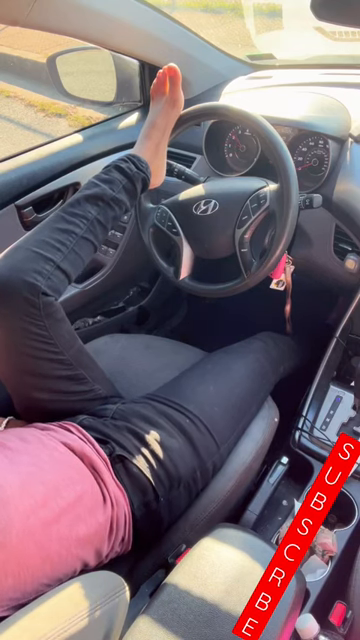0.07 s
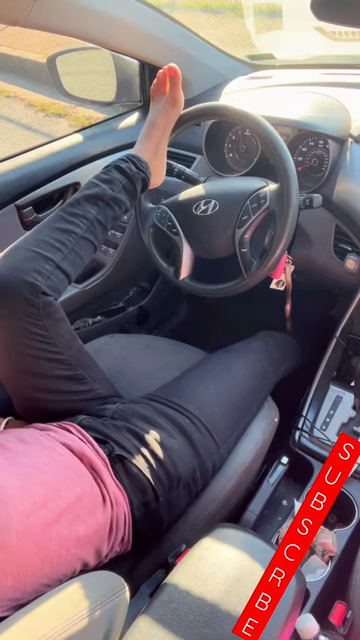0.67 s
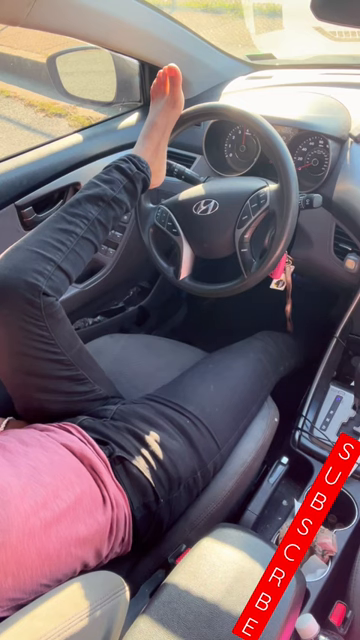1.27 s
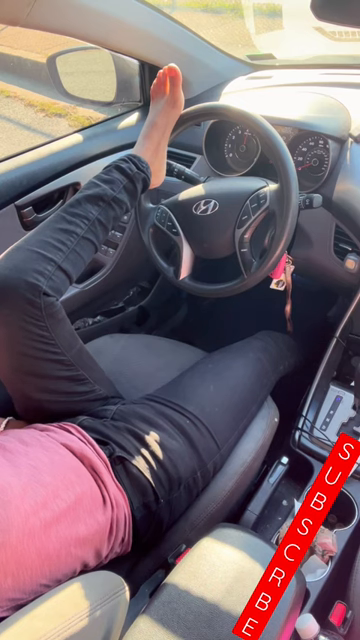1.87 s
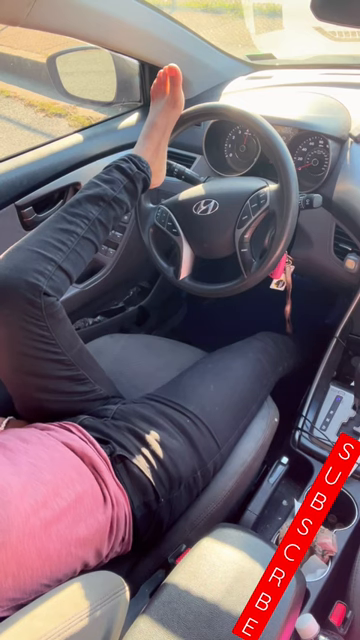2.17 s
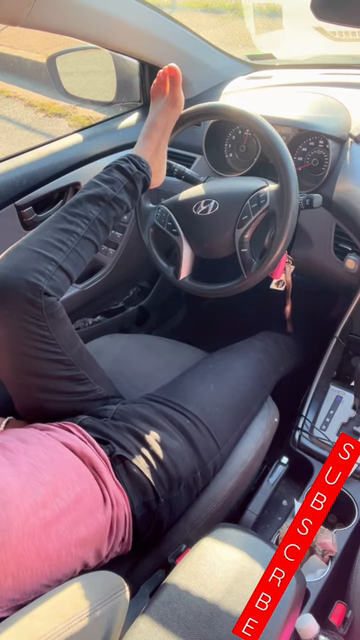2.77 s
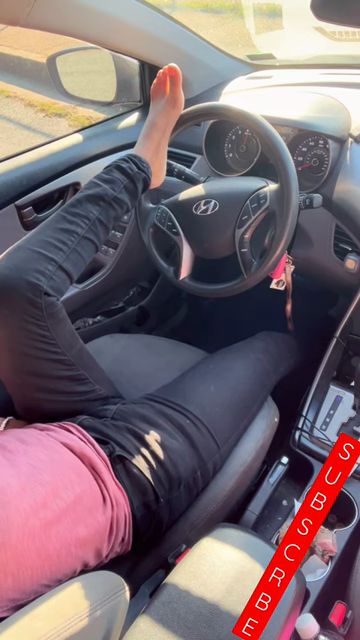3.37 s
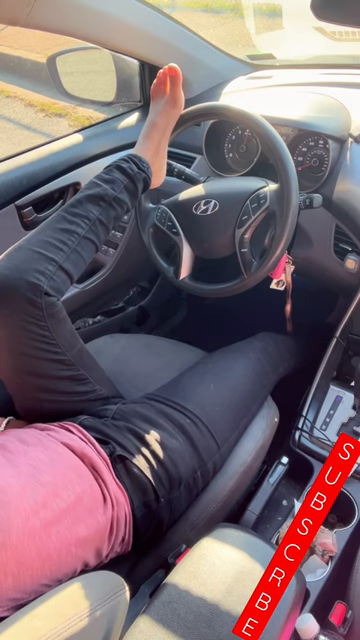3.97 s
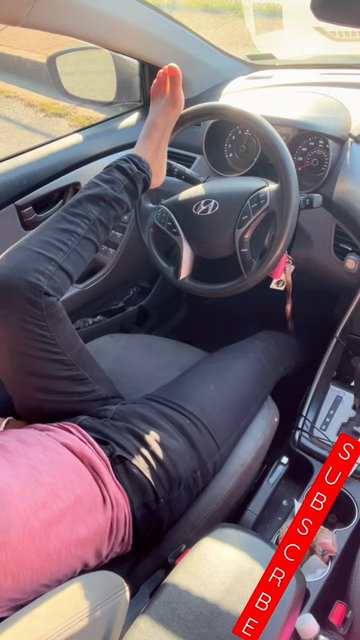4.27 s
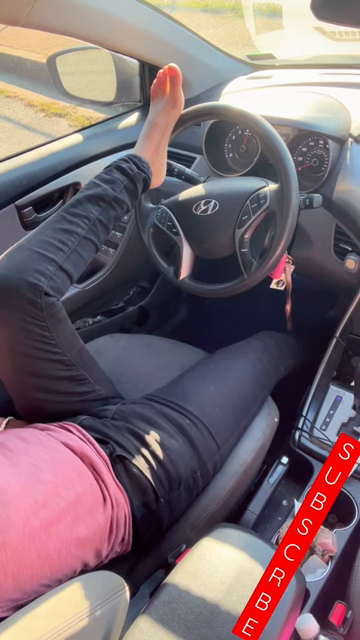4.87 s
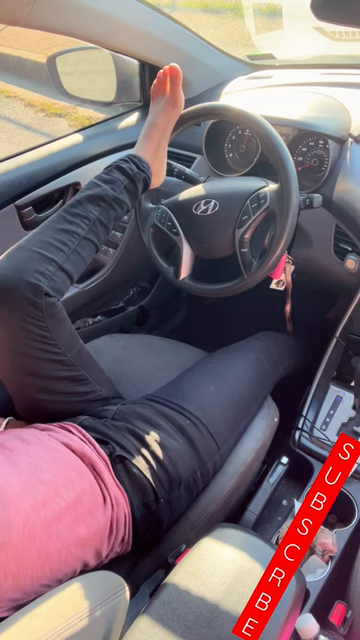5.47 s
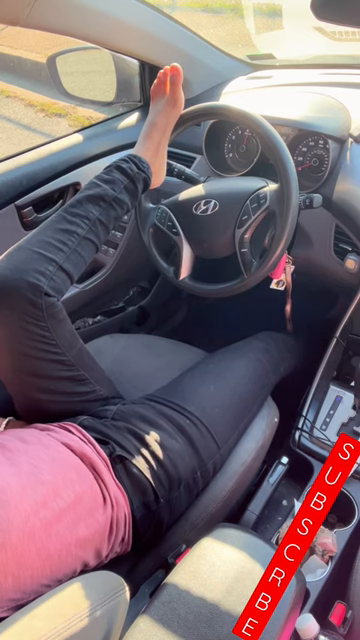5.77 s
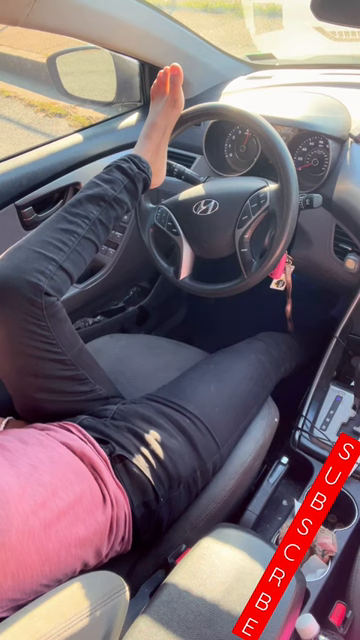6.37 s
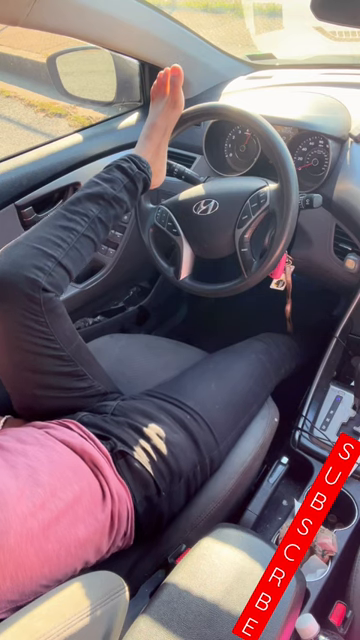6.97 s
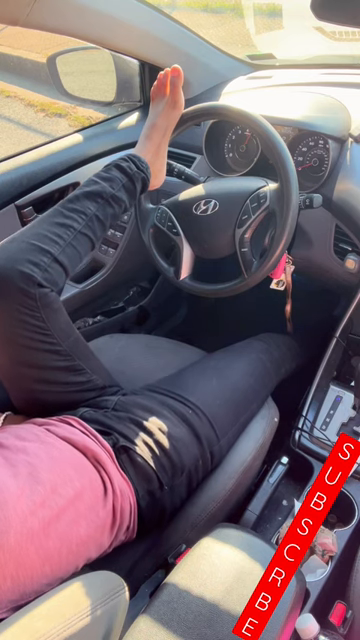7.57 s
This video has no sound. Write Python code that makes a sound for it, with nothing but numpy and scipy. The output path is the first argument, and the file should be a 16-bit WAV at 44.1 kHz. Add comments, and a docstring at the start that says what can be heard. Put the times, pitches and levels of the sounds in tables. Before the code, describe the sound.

Inside a parked car, the engine is revved about eleven times with a booming growl, then held at steady speed with a faint whine.

```python
"""Revving a parked car

A four-cylinder engine from the seat, on a two-port microphone: the pedal is pumped again and again,
then held. The firing note booms in the cabin and cancels briefly as the load changes; weaker crank and
cam orders growl over it and the body shakes. Valve gear clatters behind the bulkhead, the intake hisses
with the throttle, and belt-driven accessories whine at the held speed."""
import sys
import numpy as np
from scipy import signal
from scipy.fft import rfft, irfft
from scipy.io import wavfile
from scipy.ndimage import uniform_filter1d

SR = 44100
rng = np.random.default_rng(int(sys.argv[2]) if len(sys.argv) > 2 else 0)


def transcribe(u):
    """Save the signal u as a 16-bit wav file named by the first command-line argument.

    u: samples, shape (n,) or (channels, n), limited to [-1, 1]; the rate is SR.
    q: integer samples, one column per channel.
    """
    v = np.clip(np.atleast_2d(u).T, -1, 1)
    q = np.round(v * 32767).astype(np.int16)
    wavfile.write(sys.argv[1], SR, q)


N = 340011
TIME = np.arange(N) / SR
BINS = np.fft.rfftfreq(N, 1 / SR)
TICKS = np.arange(0, N / SR, 1 / 400)  # control times, s
FIRINGS = 4  # per four-stroke cycle; an order is a multiple of the cycle rate
MIDDLE_HZ, HIGH_HZ = 158, 163.6  # firing rates at middle and high engine speed

# pumps of the pedal: press t/s, firing f/Hz, crest t/s, firing f/Hz; then the boom in each pump:
# coasting swell t/s, lift/dB, sag t/s, depth/dB, lift under load/dB, unloading t/s, coasting t/s
PUMPS = [(-0.12, 119.0, 0.119, 131.7, 0.13, 7.5, 0.209, 8, 0.5, 0.051, 0.13),
         (0.494, 110.3, 0.858, 157.7, 0.651, 5.5, 0.734, 14.5, 7.5, 0.873, 1.04),
         (1.27, 130.4, 1.635, 161.8, 1.174, 10.5, 1.28, 5, 7.5, 1.556, 1.72),
         (1.947, 140.6, 2.131, 156.0, 1.934, 10.1, 1.8, 0.0, 6.0, 2.138, 2.24),
         (2.377, 138.8, 2.591, 158.0, 2.33, 18, 2.321, 15.5, 6, 2.581, 2.661),
         (2.873, 140.7, 3.052, 156.5, 2.825, 8.5, 2.887, 1, 8, 3.059, 3.11),
         (3.308, 140.6, 3.531, 159.0, 3.267, 17.5, 3.262, 16, 6.5, 3.5, 3.64),
         (3.801, 143.1, 4.016, 157.6, 3.87, 12.0, 3.596, 5.5, 1.1, 4.017, 4.092),
         (4.275, 141.2, 4.495, 158.5, 4.3, 11, 3.974, 7, 5.5, 4.466, 4.46),
         (4.851, 136.6, 5.119, 160.2, 4.795, 12.5, 4.93, 3, 8, 5.083, 5.251),
         (5.561, 134.3, 5.877, 158, 5.5, 14, 5.56, 12, 9.5, 5.829, 5.8)]
# the pedal held after the last pump: t/s, firing f/Hz
HELD_SPEED = [(5.99, 163.55), (6.1, 166.59), (6.24, 170.19), (6.32, 165.69), (6.41, 160.14), (6.52, 158.94),
              (6.61, 158.65), (6.69, 159.04), (6.8, 160.22), (6.9, 161.09), (7.2, 163.53), (7.4, 164.16),
              (7.71, 164.71)]
# how still the pedal is: t/s, stillness/0-1
PEDAL_STILLNESS = [(0, .15), (5.7, .2), (5.95, 0.5), (6.2, 0.4), (6.45, 0.95), (7.7, 0.95)]
# mechanical effort and air flow grow with speed: firing f/Hz, effort/dB, flow/dB
EFFORT_BY_SPEED = [(111, -49, -78), (130, -45, -75.5), (142, -42.5, -74), (156, -42, -73),
                   (159, -41.4, -72), (164, -40.5, -72), (170, -39, -69)]
# the cabin's answer to the firing note: firing f/Hz, level/dB
BOOM_BY_SPEED = [(112, -24.4), (130, -31), (142, -30.5), (158, -21.5)]
# the firing note with the pedal held: t/s, level/dB
HELD_BOOM = [(5.96, -20), (6.186, -20), (6.32, -26), (6.408, -19), (6.456, -19), (6.494, -26), (6.552, -21),
             (6.58, -23), (7.69, -20)]
# the cabin's answer to the second harmonic: firing f/Hz, level/dB
SECOND_BY_SPEED = [(111, -52), (118, -45), (130, -43), (136, -37), (142, -39), (149, -38), (154, -40.5),
                   (157, -44), (160, -42.5), (162.3, -47), (164.3, -39.5), (170, -35)]
# its answer to the third harmonic: firing f/Hz, level/dB
THIRD_BY_SPEED = [(111, -50.5), (125, -48), (138, -42.5), (147, -45.5), (155, -48), (161, -43),
                  (165, -46.5), (170, -53.5)]
# flares under load: t/s, second harmonic lift/dB, third lift/dB, fourth level/dB, intake roar lift/dB
LOAD_FLARES = [(0.01, 2.5, 7, -49.5, 8), (0.77, 4.5, 3.5, -50, 11), (1.47, 2, 4.5, -48, 7.5),
               (2.06, 3.5, 8.5, -41.5, 7.5), (2.5, 2.5, 5.5, -45.5, 7.5), (2.96, 3, 7.5, -45, 8),
               (3.42, 3, 7, -50, 7), (3.91, 4.5, 7.5, -44.5, 6.5), (4.4, 5.5, 7.5, -50, 7),
               (4.99, 3.5, 8.5, -51.5, 6.5), (5.72, 3.5, 8.5, -53, 7.5)]
# crank and cam lines: order, pumped level/dB, held middle-speed level/dB, high-speed level/dB
GROWL_ORDERS = [(2, -43.5, -45, -49), (3, -50, -52, -42.5), (5, -48.5, -50, -52), (6, -53.5, -56, -56),
                (7, -55, -47.5, -41), (9, -53.5, -45, -50), (10, -52, -56, -55), (11, -55, -51, -60.5),
                (13, -56, -58.5, -58), (14, -53.5, -51, -59), (15, -60, -54, -51.5), (16, -54, -51.5, -47),
                (17, -63, -63, -65), (18, -53.5, -59, -54), (19, -66, -60.5, -57), (20, -59, -61, -65),
                (21, -61, -65, -64), (22, -63, -56, -55), (23, -64.5, -70.5, -76), (24, -64, -59, -58),
                (25, -72.5, -59, -55.5), (26, -64.5, -60.5, -60.5), (27, -72, -63, -68.5),
                (28, -64, -65, -62), (29, -73.5, -72, -69), (30, -66.5, -67, -64.5)]
# cabin resonances: f/Hz, width/Hz, lift/dB
CABIN_MODES = [(70.3, 6, 4), (186, 40, 8.5), (360, 16, 5), (613.5, 24, 8), (1016, 52, 12), (1067, 47, 8)]
# spectrum of the shaking body panels: f/Hz, level/dB
RUMBLE_SPECTRUM = [(12, -25), (25, -7.5), (37, -1.5), (50, -3.5), (72, 1.5), (95, -2.5), (130, 3.5),
                   (185, 1), (240, -10), (400, -26), (1000, -72.5)]
# spectrum of the mechanical noise behind the bulkhead: f/Hz, level/dB
CLATTER_SPECTRUM = [(120, -23), (220, -3), (400, 1), (640, -2.5), (860, -8.5), (950, -9), (1030, -3),
                    (1130, -12), (1200, -13), (1600, -16), (2150, -18), (2500, -22.5), (3100, -28),
                    (4400, -40), (6600, -42.5), (9000, -57.5)]
# outline of the valve gear's lines: f/Hz, level/dB
VALVE_SPECTRUM = [(1000, -66.5), (1300, -67.5), (1600, -68.5), (2200, -69), (2500, -74.5), (3100, -80),
                  (4000, -86.5), (4600, -90.5), (5500, -95.5), (6700, -92.5)]
# bulkhead panel resonances: f/Hz, width/Hz, lift/dB
BULKHEAD_MODES = [(1062, 45, 9), (1330, 40, 3), (1502, 46, 5.5), (1606, 29, 5), (1902, 80, 5),
                  (2130, 38, 11), (2540, 45, 2.5), (6040, 68, 10), (6470, 90, 12.5)]
# spectrum of the cam drive's rasp: f/Hz, level/dB
RASP_SPECTRUM = [(600, -20), (1300, -2.5), (1800, -1.5), (2150, 2), (2600, -9), (3200, -10), (4200, -18),
                 (5200, -24), (8000, -42)]
# strength of that rasp: firing f/Hz, level/dB
RASP_BY_SPEED = [(111, -68.5), (130, -62.5), (142, -59.5), (155, -57), (160, -55.8), (164, -56), (170, -56)]
# throttle hiss as picked up, with a dip near 10 kHz and the microphone's peak at 14 kHz: # f/Hz, level/dB
HISS_AS_PICKED_UP = [(1500, -22), (3000, -1), (4200, 0.5), (5200, 0.5), (6800, 3), (8500, -10.5),
                     (11000, -16), (12500, -7), (14000, 3.5), (15000, -5), (16000, 0)]
# throttle hiss at each press: t/s, half-length/s, lift/dB
HISS_PUFFS = [(0.077, .07, 7), (.83, .09, 7.5), (1.52, .12, 6), (2.12, .055, 7), (2.57, .065, 6.5),
              (3.04, .06, 6), (3.5, .065, 5.5), (3.98, .055, 5.5), (4.47, .06, 5), (5.069, .085, 5.5),
              (5.813, .075, 6)]
# spectrum of the air box, heard in the cabin: f/Hz, level/dB
ROAR_SPECTRUM = [(120, -24), (220, -2), (380, 0), (650, -1), (850, -8), (960, -9.5), (1030, -3.5),
                 (1130, -14.5), (1500, -24), (3000, -52)]
# gear and accessory lines: order, resonant firing f/Hz, width/Hz, level/dB
GEAR_WHINES = [(32, 165, 11, -58), (35, 159, 8, -68), (36, 164, 9, -63), (36, 140, 6, -53.5),
               (40, 159.7, 5.5, -58), (41, 159.5, 6, -65), (44, 161, 7, -64), (44, 168, 7, -58),
               (46, 164.3, 5, -65), (47, 162, 12, -65), (48, 160, 6, -62.5), (52, 163.2, 9, -50),
               (53, 160, 6.5, -60), (54, 161, 8, -68.5), (58, 180, 7, -55.5), (60, 164.2, 5.8, -53.5),
               (62, 160, 8, -68), (76, 163.8, 5, -72), (152, 170, 5, -73.5)]
# alternator lines: shaft harmonic, level/dB
ALTERNATOR_LINES = [(1, -45), (2, -42), (4, -63), (5, -60), (6, -67), (9, -73), (10, -69), (11, -74),
                    (12, -76), (15, -85), (17, -81), (18, -81.5), (19, -86), (21, -83), (23, -90),
                    (24, -90)]
# the alternator housing's resonance: f/Hz, width/Hz, lift/dB
HOUSING_MODE = [(3612, 70, 12)]
# colour of the cabin reflections: f/Hz, level/dB
REFLECTION_SPECTRUM = [(100, -14), (290, -2), (500, 4), (2000, 2), (7000, 0)]
# how alike noise is at the two microphone ports: f/Hz, correlation/0-1
PORT_LIKENESS = [(60, .995), (130, .985), (290, .88), (660, .5), (1050, .8), (1400, .5), (2200, .7),
                 (3500, .15), (4500, .35), (6000, .72), (7500, .6), (13000, .98)]
# left port over right: f/Hz, level/dB
PORT_BALANCE = [(30, .2), (120, .6), (148, 1.2), (159, 1.5), (164, 2.2), (170, 3), (200, 2), (350, 2.3),
                (700, 2.1), (1400, 1.4), (2500, 2), (5000, .4), (14000, .3)]
# lead of the left port: f/Hz, phase/rad
PORT_LEAD = [(20, 0), (150, -.15), (400, -.42), (650, -.5), (800, -.95), (1100, -.8), (2100, -1.8),
             (3200, -3.6), (3800, -5.4), (4300, -5.8), (4800, -5), (6200, -5.1), (8500, -3.6),
             (12500, -6.2)]


def from_db(db):
    """Decibels to gain."""
    return 10 ** (np.asarray(db) / 20)


def unit(x):
    """Scales to rms 1."""
    return x / np.sqrt(np.mean(x ** 2) + 1e-20)


def by_hz(points, hz):
    """Reads a curve on a log-frequency axis."""
    f, value = np.transpose(points)
    return np.interp(np.log(hz + 1), np.log(f + 1), value)


def audio(control):
    """From control ticks to samples."""
    return np.interp(TIME, TICKS, control)


def drift(rate_hz):
    """Slow random wander of rms 1, up to about the given rate."""
    knots = rng.standard_normal(1000)
    return unit(np.interp(TICKS * 2 * rate_hz, np.arange(len(knots)), knots))


def bumps(centres, half_s, heights=1):
    """A sum of bell-shaped swells on the control ticks."""
    return np.sum(heights * np.exp(-((TICKS[:, None] - centres) / half_s) ** 2), axis=1)


def cancelling(times, half_s=.022):
    """A gain that passes through zero and changes sign at each of the times."""
    return np.prod(np.tanh((TICKS[:, None] - times) / half_s), axis=1)


def peaks_db(resonances, hz):
    """Gain in dB of a set of resonances at a moving frequency."""
    return sum(db / (1 + (2 * (hz - centre) / width) ** 2) for centre, width, db in resonances)


def noise(spectrum):
    """Coloured noise of rms 1, partly alike at the two microphone ports."""
    left, other = rfft(rng.standard_normal((2, N)))
    likeness = by_hz(PORT_LIKENESS, BINS)
    right = likeness * left + np.sqrt(1 - likeness ** 2) * other
    return unit(irfft(np.array([left, right]) * from_db(by_hz(spectrum, BINS)), N))


def line(cycles, order):
    """A sine of rms 1 locked to the engine cycle."""
    return np.sqrt(2) * np.sin(2 * np.pi * (order * cycles + rng.random()))


def blend(start, end, share):
    """Crossfades from start to end as share goes from 0 to 1."""
    return start + share * (end - start)


def stillness():
    """Near 0 while the pedal is pumped, near 1 while it is held still."""
    return np.interp(TICKS, *np.transpose(PEDAL_STILLNESS))


def high_speed(firing_hz, from_hz=MIDDLE_HZ):
    """0 up to the given firing rate, 1 at high speed."""
    return np.clip((firing_hz - from_hz) / (HIGH_HZ - from_hz), 0, 1)


def engine_speed(rise_bend=1.25, fall_bend=1.2):
    """Firing rate in Hz: it gathers pace at each press, eases down to the next, and at last is held."""
    presses_and_crests = np.array(PUMPS)[:, :4].reshape(-1, 2)
    times, hz = np.vstack([presses_and_crests, HELD_SPEED]).T
    knots = np.arange(len(times))
    leg, part = np.divmod(np.interp(TICKS, times, knots), 1)
    bent = np.where(leg % 2, 1 - (1 - part) ** fall_bend, part ** rise_bend)
    pumping = leg < len(presses_and_crests) - 1
    position = leg + np.where(pumping, bent, part)
    return uniform_filter1d(np.interp(position, knots, hz), size=15)


def surge(lag_s, half_s, heights=1, usual_climb_hz=18):
    """A swell late in each climb of speed, longer for a longer press, stronger for a bigger climb."""
    press, low_hz, crest, top_hz, *_ = np.transpose(PUMPS)
    climb_s = crest - press
    strength = ((top_hz - low_hz) / usual_climb_hz) ** .08
    return bumps(press + .68 * climb_s + lag_s, half_s + .15 * climb_s, heights * strength)


def engine_effort(firing_hz, press_db=2):
    """How hard the engine works, rms 1: more with speed and at each press."""
    hz, db, _ = np.transpose(EFFORT_BY_SPEED)
    return unit(from_db(np.interp(firing_hz, hz, db) + press_db * surge(lag_s=.018, half_s=.04)))


def boom(cycles, firing_hz, trim_db=.1, load_lead_s=.065, handover_s=.06, catch_db=6):
    """The firing note fills the cabin under load and flips where crank shake and exhaust pulse cancel."""
    *_, swell, swell_db, sag, sag_db, load_db, unload, coast = np.transpose(PUMPS)
    pumped_db = by_hz(BOOM_BY_SPEED, firing_hz) + bumps(swell, .11, swell_db)
    pumped_db += bumps(unload - load_lead_s, .054, load_db) - bumps(sag, .061, sag_db)
    pumped_db -= bumps(coast[-1:], .022, catch_db)  # the last pump is caught before it coasts: only a dip
    held_db = np.interp(TICKS, *np.transpose(HELD_BOOM))
    held = np.clip((TICKS - coast[-1]) / handover_s, 0, 1)
    level = from_db(blend(pumped_db, held_db, held) + trim_db)
    polarity = cancelling(unload) * cancelling(coast[:-1], half_s=.033)
    flutter = 1 + blend(.12, .035, stillness()) * drift(16)
    return audio(polarity * level * flutter) * line(cycles, FIRINGS)


def overtones(cycles, firing_hz, flare_s=.045, dip_db=7):
    """Harmonics 2-4 of the firing note flare under load; the second dips after each crest."""
    _, _, crest, *_, unload, _ = np.transpose(PUMPS)
    flare, second_db, third_db, fourth_db, _ = np.transpose(LOAD_FLARES)
    dips_db = bumps(crest + .04, .041, dip_db)
    second = from_db(by_hz(SECOND_BY_SPEED, firing_hz) + bumps(flare, flare_s, second_db) - dips_db)
    third = from_db(by_hz(THIRD_BY_SPEED, firing_hz) + bumps(flare, flare_s, third_db))
    third *= cancelling(unload - .03)  # just before the boom cancels
    fourth = bumps(flare + .023, flare_s, from_db(fourth_db))
    rough = blend(.3, .071, high_speed(firing_hz))
    return sum(audio(level * (1 + rough * drift(30))) * line(cycles, harmonic * FIRINGS)
               for harmonic, level in [(2, second), (3, third), (4, fourth)])


def growl(cycles, firing_hz, effort, pumped_trim_db=-1, held_trim_db=-.5):
    """Unequal cylinders give lines at multiples of the cycle rate, sweeping through the cabin modes."""
    high = high_speed(firing_hz, from_hz=160)
    held = np.maximum(high, stillness() ** 2)
    rough = blend(.33, .22, held)
    out = np.zeros(N)
    for order, base_db, middle_db, high_db in GROWL_ORDERS:
        hz = order * firing_hz / FIRINGS
        pumped_db = base_db + pumped_trim_db + peaks_db(CABIN_MODES, hz)
        held_db = blend(middle_db, high_db, high) + held_trim_db
        level = from_db(blend(pumped_db, held_db, held)) * np.sqrt(effort)
        out += audio(level * (1 + rough * drift(5))) * line(cycles, order)
    return out


def body_rumble(firing_hz, effort, base_db=-38.5, high_db=-2.5):
    """All round the seat the body shakes on the engine mounts, more with effort, less at high speed."""
    level = from_db(base_db + high_db * high_speed(firing_hz) + drift(4.1)) * effort ** .29
    return audio(level) * noise(RUMBLE_SPECTRUM)


def clatter(cycles, firing_hz, effort, base_db=-44, high_db=-1.5, held_db=-3):
    """Combustion and valve noise behind the bulkhead throbs with each firing, crank turn and cycle."""
    throb = 1 + .12 * line(cycles, FIRINGS) + .038 * line(cycles, 2) + .069 * line(cycles, 1)
    level = from_db(base_db + high_db * high_speed(firing_hz) + held_db * stillness()) * effort ** 1.3
    return audio(level) * unit(noise(CLATTER_SPECTRUM) * throb)


def valve_gear(cycles, firing_hz, effort, trim_db=-1.5, uneven_db=2.5, firing_db=2, odd_db=-4.5):
    """Valves repeat each cycle: a comb of fine lines that flare through the panel modes; a few whine."""
    mode_hz = np.arange(700, 7500, 25)
    rough = blend(.65, .15, stillness())
    drive = from_db(trim_db) * effort
    out = np.zeros(N)
    for order in range(31, 165):
        hz = order * firing_hz / FIRINGS
        pattern_db = firing_db * (order % FIRINGS == 0) + odd_db * (order % 2)
        ripple = np.clip(rng.standard_normal(len(mode_hz)), -2, 1.5)
        panel_db = peaks_db(BULKHEAD_MODES, hz) + uneven_db * np.interp(hz, mode_hz, ripple)
        level = from_db(by_hz(VALVE_SPECTRUM, hz) + panel_db + pattern_db) * drive
        level *= 1 + rough * drift(3)
        out += audio(np.hypot(level, gear_whine_level(order, firing_hz))) * line(cycles, order)
    return out


def cam_drive(cycles, firing_hz):
    """The cam drive rasps with engine speed alone, throbbing with each crank turn and firing."""
    throb = 1 + .12 * line(cycles, 2) + .15 * line(cycles, FIRINGS)
    return audio(from_db(by_hz(RASP_BY_SPEED, firing_hz))) * noise(RASP_SPECTRUM) * throb


def intake(firing_hz, hiss_db=5, roar_db=25.5, held_db=-9, lugging_db=6):
    """At each press air hisses past the throttle and roars in the air box, which low speed favours."""
    hz, _, db = np.transpose(EFFORT_BY_SPEED)
    flow_db = np.interp(firing_hz, hz, db)
    lugging = np.clip((MIDDLE_HZ - firing_hz) / (MIDDLE_HZ - firing_hz.min()), 0, 1)
    gulp_db = surge(lag_s=.011, half_s=.05, heights=np.array(LOAD_FLARES)[:, -1])
    roar = from_db(flow_db + roar_db + gulp_db + held_db * stillness() + lugging_db * lugging)
    hiss = from_db(flow_db + hiss_db + bumps(*np.transpose(HISS_PUFFS)))
    return audio(hiss) * noise(HISS_AS_PICKED_UP) + audio(roar) * noise(ROAR_SPECTRUM)


def gear_whine_level(order, firing_hz, waver=.21, build_s=.03):
    """How strongly one order sings: it builds up near its resonant speed as the pedal comes to rest."""
    ring = np.zeros(len(TICKS))
    for whine_order, resonant_hz, width, db in GEAR_WHINES:
        if whine_order == order:
            ring += from_db(db) / (1 + (2 * (firing_hz - resonant_hz) / width) ** 2) ** 2
    decay = np.exp(-TICKS[1] / build_s)
    return signal.lfilter([1 - decay], [1, -decay], ring) * stillness() * (1 + waver * drift(14))


def belt_whine(cycles, firing_hz, alternator_order=4.975, pulley_order=12.63, pulley_db=-56, waver=.15):
    """Alternator and pulley turn out of step with the crank; a line whistles at the housing's mode."""
    out = audio(from_db(pulley_db) * (1 + waver * drift(6))) * line(cycles, pulley_order)
    for harmonic, db in ALTERNATOR_LINES:
        order = harmonic * alternator_order
        level = from_db(db + peaks_db(HOUSING_MODE, order * firing_hz / FIRINGS))
        out += audio(level * (1 + waver * drift(6))) * line(cycles, order)
    pedal_db = .55 - 9 * (1 - stillness())  # faint until the pedal is held
    return out * audio(from_db(pedal_db))


def cabin_reflections(direct, trim_db=-12, t60_s=.1, held_cut=.65):
    """Nearby glass and trim reflect differently to each port, so a gliding line wanders between them."""
    t = np.arange(SR // 8) / SR
    tail = rng.standard_normal(len(t)) * np.exp(-np.log(1000) * t / t60_s)
    colour = from_db(trim_db + by_hz(REFLECTION_SPECTRUM, BINS))
    side = irfft(rfft(direct) * rfft(tail / np.linalg.norm(tail), N) * colour, N)
    side *= audio(1 - held_cut * stillness())
    return np.array([direct + side, direct - side])


def scene():
    """The engine from the seat: one slightly uneven crankshaft drives every layer."""
    firing_hz = engine_speed()
    jitter = .0003 + .003 * (1 - stillness())  # share of the crank speed
    cycles = np.cumsum(audio(firing_hz * (1 + jitter * drift(20)))) / SR / FIRINGS
    effort = engine_effort(firing_hz)
    tones = overtones(cycles, firing_hz) + growl(cycles, firing_hz, effort)
    gear = valve_gear(cycles, firing_hz, effort) + belt_whine(cycles, firing_hz)
    noises = clatter(cycles, firing_hz, effort) + cam_drive(cycles, firing_hz)
    noises += body_rumble(firing_hz, effort) + intake(firing_hz)
    return boom(cycles, firing_hz) + cabin_reflections(tones) + gear + noises


def record(dry, image_hz=9600, image_db=-62, edge_hz=15850):
    """Two microphone ports in the cabin, unequal in level and arrival time, feed a band-limited recorder."""
    left_gain = from_db(by_hz(PORT_BALANCE, BINS) / 2) * np.exp(.5j * by_hz(PORT_LEAD, BINS))
    ports = irfft(rfft(dry) * np.array([left_gain, 1 / left_gain]), N)
    # the recorder mirrors a trace of the sound around image_hz
    ports *= 1 + from_db(image_db) * np.cos(2 * np.pi * image_hz * TIME)
    low_pass = signal.firwin(511, edge_hz, window=("kaiser", 9), fs=SR)
    return signal.oaconvolve(ports, low_pass[None], "same", axes=1)


dry = scene()
out = record(dry)
transcribe(out)
```